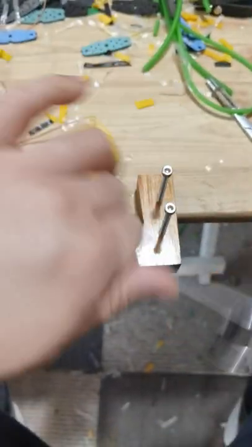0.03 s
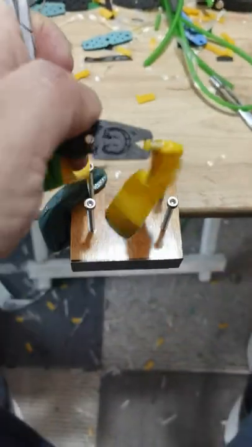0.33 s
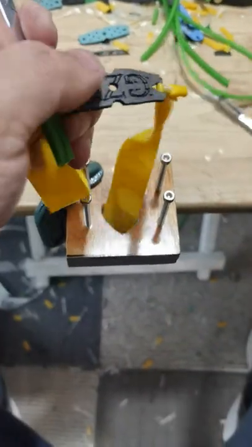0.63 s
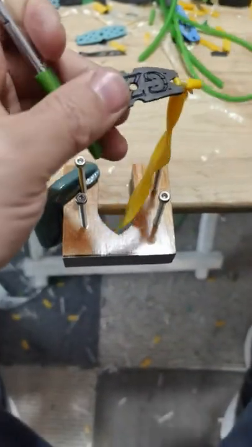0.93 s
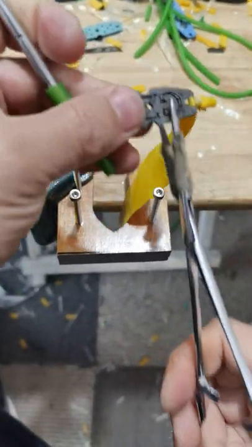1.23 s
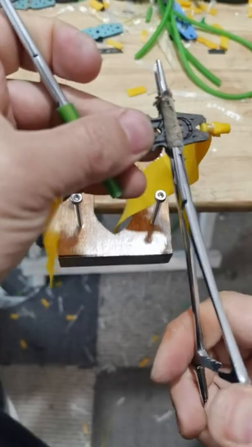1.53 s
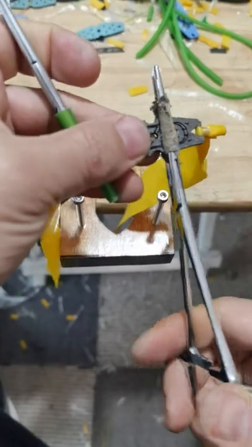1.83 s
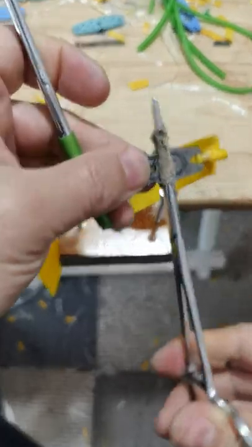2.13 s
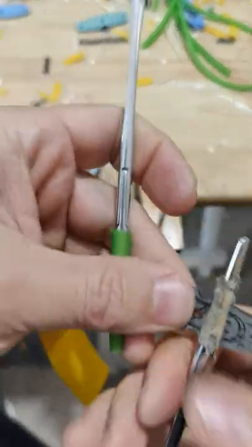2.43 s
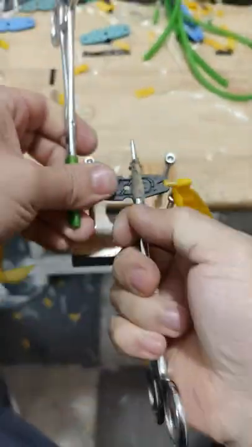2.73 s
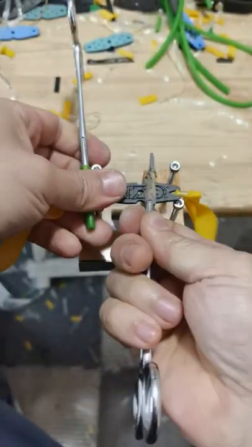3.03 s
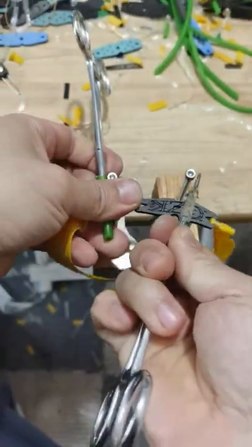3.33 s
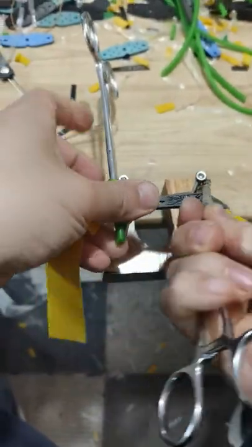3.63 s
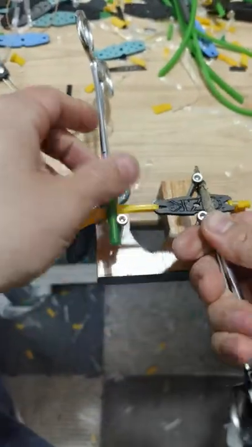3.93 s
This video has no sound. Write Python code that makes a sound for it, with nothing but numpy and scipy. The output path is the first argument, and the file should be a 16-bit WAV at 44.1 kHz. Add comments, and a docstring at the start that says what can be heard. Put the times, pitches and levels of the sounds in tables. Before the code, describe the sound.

After some faint handling and ticking, a steel clamp ratchets shut in a few sharp, close clicks. Then its jaws scrape and tools tick and clack against a wooden jig, over a quiet room's low rumble.

```python
"""At a wooden workbench in a small room, steel forceps are locked onto a small plastic part close by.
Impacts excite the modes of steel and wood: the ratchet snaps over its teeth, the tips tick and ping,
tools clack, and the wooden jig is knocked and nudged. Stick-slip friction makes the jaws scrape and the
part drag. Hands rustle throughout over a low rumble, and the steel reverberates faintly in the room."""
import sys
import numpy as np
from scipy import signal
from scipy.fft import rfft, irfft, next_fast_len
from scipy.io import wavfile

SR = 44100
rng = np.random.default_rng(int(sys.argv[2]) if len(sys.argv) > 2 else 0)


def to_wav(sig):
    """Store sig (one row per channel, or 1-D mono) as 16-bit WAV at the path in sys.argv[1].

    Samples outside -1..1 are clipped; the rate is SR.
    """
    pcm = np.clip(np.atleast_2d(sig), -1, 1) * 32767
    pcm = np.round(pcm).astype(np.int16)
    wavfile.write(sys.argv[1], SR, pcm.T)  # frames by channels


N = 176400

# spectrum of a steel-on-steel crack (frequency [Hz], gain [dB])
STEEL_CRACK_SPECTRUM = [(200, -43), (1500, -9.5), (3500, -22), (5500, -2.5), (8000, 7), (10500, 2),
                        (12200, -28), (16000, -32)]
# resonances of the wood (frequency [Hz], bandwidth [Hz], gain [dB])
WOOD_MODES = [(200.5, 19.3, 3), (405, 97, -1), (539, 87, 0.5), (650, 48, -1), (878, 68, 1),
              (1344, 64, -5.5), (1604, 31, 0.5), (2080, 36, -10.5)]


def amp(db):
    """Decibels to amplitude ratio."""
    return 10 ** (np.asarray(db) / 20)


def unit(x):
    """Normalisation to rms 1."""
    return x / np.sqrt(np.mean(x ** 2) + 1e-20)


def along(points, hz):
    """Interpolation of (frequency [Hz], value) points on a logarithmic axis."""
    freqs, values = np.transpose(points)
    return np.interp(np.log(hz + 1), np.log(freqs + 1), values)


def curve(rows):
    """Linear interpolation of (time [s], value) rows at every sample."""
    return np.interp(np.arange(N) / SR, *np.transpose(rows))


def wobble(rate):
    """Random modulation: straight lines between rate Gaussian knots a second."""
    return np.interp(np.arange(N) * rate / SR, np.arange(N), rng.standard_normal(N))


def pan(db):
    """Interaural level difference: two gains, left over right by db."""
    return amp(np.array([[db], [-db]]) / 2)


def filtered(x, response):
    """Linear filtering: the spectrum of x times a frequency response."""
    n = x.shape[-1]
    padded = next_fast_len(n + SR // 10)
    hz = np.fft.rfftfreq(padded, 1 / SR)
    return irfft(rfft(x, padded) * response(hz), padded)[..., :n]


def shelf(x, hz, low_db, high_db):
    """Shelving filter: separate gains below and above hz."""
    return filtered(x, lambda f: amp(high_db + (low_db - high_db) / (1 + (f / hz) ** 4)))


def colour(points):
    """Spectral envelope through (frequency [Hz], gain [dB]) points."""
    return lambda f: amp(along(points, f))


def body(modes):
    """Modal superposition: the response of second-order resonators of alternating sign."""
    return lambda f: sum((-1) ** k * amp(db) * 1j * f * width / (hz * hz - f * f + 1j * f * width)
                         for k, (hz, width, db) in enumerate(modes))


def noise(response, n):
    """Partly coherent stereo noise of rms 1, nearly mono in the bass."""
    # likeness of left and right (frequency [Hz], correlation [ratio])
    coherence = [(60, 0.73), (180, 0.91), (550, 0.34), (1600, 0), (15000, 0)]

    def mid_side_response(f):
        angle = np.arccos(np.clip(along(coherence, f), -1, 1)) / 2
        return response(f) * np.array([np.cos(angle), np.sin(angle)])

    mid, side = filtered(rng.standard_normal((2, n)), mid_side_response)
    return unit(np.array([mid + side, mid - side]))


def grit(response, n, slips_per_s=1800, spread_db=1, slip_share=0.51):
    """Stick-slip friction: tiny random impulses share the power with a smooth hiss, rms about 1."""
    sizes = amp(spread_db * np.clip(rng.standard_normal(n), -2, 2)) * rng.standard_normal((2, n))
    slipping = rng.random(n) < slips_per_s / SR
    slips = unit(filtered(sizes * slipping, response))
    return np.sqrt(slip_share) * slips + np.sqrt(1 - slip_share) * noise(response, n)


def decay(t, t60, attack=0.0001):
    """Damping: a quick rise, then an exponential fall of 60 dB in t60 seconds; silent before t = 0."""
    t = np.maximum(t, 0)
    return amp(-60 * t / t60) * (1 - np.exp(-t / attack))


def swell(peak_s, db, rise, fall):
    """Exponential growth and decay, 20 dB down one rise before the peak and one fall after it."""
    t = np.arange(N) / SR
    return amp(db - 20 * np.maximum((peak_s - t) / rise, (t - peak_s) / fall))


def add(out, start_s, x):
    """Superposition of x onto out from start_s."""
    i = max(round(start_s * SR), 0)
    out[:, i:i + x.shape[1]] += x[:, :max(N - i, 0)]


def rumble():
    """Ambient noise: the room's low rumble swells when the arms move."""
    # course of the rumble (time [s], relative level [dB])
    levels = [(0, -51), (.3, -54), (.8, -56), (1.5, -63.5), (2, -61), (2.8, -58), (3.3, -57.5), (4, -57)]
    # room noise (frequency [Hz], gain [dB])
    spectrum = [(20, -16), (45, -8.5), (65, 6), (90, -2.5), (130, -4.5), (250, -8), (500, -20.5),
                (1000, -33), (3000, -32.5), (8000, -49)]
    return amp(curve(levels) + 1.5) * noise(colour(spectrum), N)


def rustle():
    """Friction noise: fingers rub on steel and ribbon, a hiss made grainy by amplitude modulation."""
    # course of the rubbing (time [s], relative level [dB])
    levels = [(0, -55.5), (.06, -53), (.12, -60.5), (.19, -58.5), (.3, -58), (.9, -59.5), (1.04, -59),
              (1.28, -64), (1.55, -70.5), (1.79, -70.5), (2.02, -63), (2.3, -58.5), (2.55, -57),
              (2.85, -63.5), (2.99, -61), (3.13, -50), (3.35, -62), (3.6, -56.5), (3.83, -57.5), (4, -77)]
    # hiss of the fingers (frequency [Hz], gain [dB])
    spectrum = [(100, -8.5), (400, -6), (1000, -13.5), (2600, -14), (4000, -17.5), (6000, -7.5), (7200, -9),
                (8500, 1), (10000, -14.5), (11500, -24), (15000, -79)]
    grain_db = 1.5 * wobble(rate=400) + 2.27 * wobble(rate=25.49)
    return amp(curve(levels) + 3 + grain_db) * pan(db=-3.5) * noise(colour(spectrum), N)


def judder():
    """Forced vibration: the jig shudders in its lowest modes as the hand grabs the part."""
    # course of the shudder (time [s], level [dB])
    levels = [(0, -40.5), (.06, -36.5), (.09, -44.5), (.2, -50), (.3, -49), (.45, -80)]
    # low resonances of the jig (frequency [Hz], bandwidth [Hz], gain [dB])
    modes = [(78, 23, -6), (123.5, 17.5, -1.5), (182.4, 28, -9.5)]
    return amp(curve(levels)) * noise(body(modes), N)


def ticks():
    """Impact excitation: the steel tips touch, giving a crack and one short, high ring."""
    # touches (time [s], relative level [dB], left minus right [dB], ring frequency [Hz])
    touches = [(0.0578, -32.5, 0, 8140), (0.078, -38, -5, 8300), (0.24, -31.5, -18.5, 8210),
               (0.5029, -19, 0, 9650), (0.646, -33, 6, 9270), (0.8438, -38.5, -2, 8420),
               (1.439, -43.5, 6, 8530), (2.071, -29, 16, 8800), (2.2448, -36.5, -1, 8400),
               (2.89, -28.5, -6, 8500), (3.1537, -11, 4.5, 8410), (3.233, -34, -7, 7700),
               (3.2423, -13, 3, 8300), (3.2455, -18, 0, 8400), (3.2498, -9.5, 2, 7770),
               (3.254, -14, 14, 8500), (3.2574, -15, 10, 8500), (3.268, -18, 3, 8130),
               (3.442, -22.5, 7, 8700), (3.6162, -13, 10.5, 9010), (3.76, -23, -4, 7540),
               (3.9026, -18, 5.5, 9540)]
    out, t = np.zeros((2, N)), np.arange(SR // 20) / SR
    for start, db, pan_db, hz in touches:
        crack = noise(colour(STEEL_CRACK_SPECTRUM), len(t)) * decay(t, t60=0.011) / 2
        ring = np.sin(2 * np.pi * (hz * t + rng.random((2, 1)))) * decay(t, t60=0.016)
        add(out, start, amp(db) * pan(pan_db) * (crack + amp(-1) * ring))
    return out


def knocks():
    """Damped resonance: a dull blow on wood gives a short crack, a main tone and a noisy ring."""
    # blows (time [s], relative level [dB], attack [s], upper band gain [dB], main tone [Hz])
    blows = [(0.224, -38, 0.0011, -2, 874), (.239, -33.5, 0.0003, 5, 422), (0.465, -40, 0.0015, -0.5, 813),
             (.507, -37, 0.0031, -1.5, 534), (.524, -41.5, 0.0033, -9, 531), (0.58, -55, 0.00068, 0, 663),
             (0.649, -37, 0.0036, -15, 492), (3.236, -32, 0.0063, -3.5, 850)]
    # crack of the contact (frequency [Hz], gain [dB])
    crack_spectrum = [(100, -12), (600, -2), (1550, 4.5), (2300, 0), (3000, -19), (4100, -9.5), (5000, -21),
                      (8500, -2), (12000, -33)]
    # stereo balance of the wood (frequency [Hz], left minus right [dB])
    balance = [(100, 4), (450, 0), (850, 5.5), (1300, 8), (2000, -5), (4000, -11), (9000, 2)]
    out, t = np.zeros((2, N)), np.arange(SR // 2) / SR
    for start, db, attack, upper_db, hz in blows:
        ring = noise(body(WOOD_MODES), len(t)) * decay(t, t60=0.24, attack=attack)
        tone = amp(-3.5) * np.sin(2 * np.pi * hz * t) * decay(t, t60=0.22, attack=attack)
        crack = noise(colour(crack_spectrum), len(t)) * decay(t, t60=0.069, attack=attack)
        add(out, start, amp(db) * (tone + shelf(ring + crack, hz=850, low_db=0, high_db=upper_db)))
    return filtered(out, lambda f: amp(np.outer([1, -1], along(balance, f)) / 2))


def pings(waver_rad=0.23):
    """Free vibration: steel that no finger damps rings on faintly, its phase a little unsteady."""
    # thin rings (time [s], frequency [Hz], level [dB], t60 [s], left minus right [dB])
    rings = [(.24, 8090, -33, 0.049, -11), (.502, 10030, -35, 0.04, -13), (.503, 7480, -39, 0.078, -12),
             (1.4397, 5830, -52, 0.043, 4), (2.303, 5790, -57.5, 0.26, -18), (2.306, 7779, -55, 0.45, -19),
             (2.89, 2515, -54.5, 0.35, -2), (2.912, 2690, -55, .22, -11), (3.243, 6080, -28, 0.1, -4),
             (3.25, 7720, -32, 0.099, -1), (3.917, 5580, -37, .25, -8), (3.917, 6500, -31.5, 0.088, -11)]
    out, t = np.zeros((2, N)), np.arange(SR // 3) / SR
    for start, hz, db, t60, pan_db in rings:
        phase = 2 * np.pi * (hz * t + rng.random((2, 1))) + waver_rad * wobble(rate=486)[:len(t)]
        add(out, start, amp(db) * pan(pan_db) * np.sin(phase) * decay(t, t60))
    return out


def drags():
    """Stick-slip excitation: the dragged part drives the wood's resonances under a light rasp."""
    # strokes (peak time [s], level [dB], rise [s], fall [s], rasp gain [dB])
    strokes = [(.515, -44, 0.077, 0.12, -7), (.65, -48, 0.079, 0.04, -4), (3.248, -31.5, 0.057, 0.092, -10)]
    # rasp of the part on wood (frequency [Hz], gain [dB])
    rasp_spectrum = [(300, 9), (1600, -4), (2500, -2.5), (4200, -2.5), (4900, -34)]
    out = np.zeros((2, N))
    for peak_s, db, rise, fall, rasp_db in strokes:
        wood = grit(body(WOOD_MODES), N)
        rasp = amp(rasp_db) * grit(colour(rasp_spectrum), N)
        out += swell(peak_s, db, rise, fall) * (wood + rasp)
    return out


def scrapes():
    """Sliding friction: serrated jaws and fingers slip over the part in gritty swells."""
    # slides (peak time [s], level [dB], rise [s], fall [s], low band gain [dB], left minus right [dB])
    slides = [(.588, -47.5, .012, 0.014, 8, -5), (2.561, -45.5, 0.21, 0.3, -1.5, -8.5),
              (3.128, -22, 0.011, 0.0098, -34, -3.5), (3.253, -18, 0.024, 0.032, -4, -1.5),
              (3.546, -40.5, 0.044, 0.051, -5, -2), (3.637, -39, 0.043, 0.021, -14, -3)]
    # scrape of the jaws (frequency [Hz], gain [dB])
    spectrum = [(300, -13), (1500, -14.5), (3000, -8.5), (4200, -10), (6000, -3.5), (8200, 2.5),
                (10000, -6), (12000, -27.5), (13500, -29), (16000, -33)]
    out = np.zeros((2, N))
    for peak_s, db, rise, fall, low_db, pan_db in slides:
        friction = shelf(grit(colour(spectrum), N), hz=3700, low_db=low_db, high_db=0)
        out += pan(pan_db) * friction * swell(peak_s, db, rise, fall)
    return out


def clacks(scatter_db=5.5):
    """Modal excitation: loose tools clack and rattle, each contact favouring different resonances."""
    # contacts (time [s], relative level [dB], left minus right [dB], t60 [s], treble gain [dB])
    contacts = [(.835, -49.5, -1, 0.22, -17), (2.888, -45.5, -2, 0.26, 0), (3.3435, -33, 1.5, 0.29, -6.5),
                (3.441, -35, -0.5, 0.31, -10), (3.802, -51.5, -4, 0.63, 0), (3.873, -44, -3.5, 0.23, 8.5),
                (3.915, -37, -2.5, 0.74, 6)]
    # rattle of the tools (frequency [Hz], gain [dB])
    rattle_spectrum = [(100, -13), (400, -6), (700, -5), (1600, -2), (2500, -4), (4000, -0.5), (6000, 3),
                       (9500, 0), (11500, -30), (15000, -57)]
    # resonances of the tools (frequency [Hz], bandwidth [Hz], mean gain [dB])
    tool_modes = [(1362, 11, 4.5), (1657, 80, 1), (2233, 250, -6.5), (2790, 94, -4), (3244, 63, 3),
                  (5600, 210, -1.5), (5980, 300, -2.5), (8600, 62, 6.5)]
    out, t = np.zeros((2, N)), np.arange(SR // 2) / SR
    for start, db, pan_db, t60, treble_db in contacts:
        modes = [(hz, width, gain + scatter_db * rng.standard_normal()) for hz, width, gain in tool_modes]
        rattle = grit(colour(rattle_spectrum), len(t))
        ring = noise(body(modes), len(t))
        clack = shelf(rattle + ring, hz=3670, low_db=0, high_db=treble_db)
        envelope = decay(t, t60, attack=0.0027) + 0.56 * decay(t, t60=0.04, attack=0.001)
        add(out, start, amp(db) * pan(pan_db) * clack * envelope)
    return out


def steel_ring(t, modes):
    """Impulse response of the forceps: one damped sinusoid for each mode."""
    return sum(amp(db) * pan(pan_db) * decay(t, t60) * np.sin(2 * np.pi * hz * t)
               for hz, db, t60, pan_db in modes)


def ratchet(split_hz=7050, low_cut_hz=1770, right_lag_s=0.000022):
    """Impact and rebound: each tooth snaps home and strikes again within 1 ms, ringing the steel."""
    # teeth (time [s], relative level [dB], left minus right [dB], high mode tuning [ratio],
    # rebound delay [ms], rebound amplitude [ratio], low mode gain [dB], low mode tuning [ratio])
    teeth = [(1.9753, -9.5, 5, 1.01, 0.98, 0.47, -4, 0.88), (1.9875, -11, -7, 1.02, 0.76, 0.4, -1, 0.96),
             (2.0043, 2.5, -3, 0.99, 0.69, 0.23, -1.5, 0.98),
             (2.0372, -2, -5.5, .99, 0.636, 0.18, -0.5, 1.072),
             (2.0859, -19.5, 3, 0.915, 0.433, 0.37, 7, 1.194)]
    # hand-damped forceps (base frequency [Hz], gain [dB], t60 [s], left minus right [dB])
    steel_modes = [(1730, -29.5, 0.012, -1), (2484, -17, 0.009, -10), (3960, -18, 0.0097, -3),
                   (4870, -17, 0.0084, -11.5), (6570, -16, 0.0056, -16), (7170, -15.5, 0.0099, -13.5),
                   (8030, -16, 0.014, -11), (8830, -7, 0.013, 2), (9180, -8.5, 0.0098, 14),
                   (10060, -16.5, 0.0063, 8), (11300, -12, 0.0088, 3.5), (12500, -21, 0.0048, -3),
                   (13600, -27, 0.0063, 3), (14800, -32, 0.0064, 0)]
    out, t = np.zeros((2, N)), np.arange(SR // 20) / SR
    arrival = t - np.array([[0], [right_lag_s]])
    for start, db, pan_db, high_tuning, rebound_ms, rebound_gain, low_db, low_tuning in teeth:
        # the modes below split_hz shift with the grip
        modes = [(hz * (low_tuning if hz < split_hz else high_tuning), gain, t60, side)
                 for hz, gain, t60, side in steel_modes]
        crack = amp(-12.5) * noise(colour(STEEL_CRACK_SPECTRUM), len(t)) * decay(t, t60=0.007)
        rebound = rebound_gain * steel_ring(arrival - rebound_ms / 1000, modes)
        snap = steel_ring(arrival, modes) + rebound + crack
        snap = shelf(snap, hz=11900, low_db=0, high_db=0.28 * db)  # harder snaps are brighter
        add(out, start, amp(db) * pan(pan_db) * shelf(snap, split_hz, low_db, high_db=0))
    return signal.sosfilt(signal.butter(4, low_cut_hz, 'high', fs=SR, output='sos'), out)


def bumps():
    """Soft impacts excite low frequencies: pushes set the jig and bench booming briefly."""
    # pushes (time [s], level [dB], frequency [Hz], attack [s], t60 [s])
    pushes = [(2.851, -43.5, 197, 0.0059, 0.47), (3.05, -44.5, 178, 0.011, 0.16),
              (3.152, -47, 188.6, 0.0047, 1), (3.345, -38, 200.5, 0.0043, 0.32),
              (3.509, -38, 220, 0.002, 0.063), (3.616, -36, 182.5, 0.002, 0.17),
              (3.838, -38, 181, 0.0039, 0.16), (3.854, -37.5, 178, 0.0032, 0.11)]
    # dull thud (frequency [Hz], gain [dB])
    thud_spectrum = [(40, -39), (120, 1), (220, 1), (450, -5.5), (700, -17.5), (1500, -23), (4000, -56)]
    out, t = np.zeros((2, N)), np.arange(SR // 2) / SR
    for start, db, hz, attack, t60 in pushes:
        boom = np.sin(2 * np.pi * hz * t) + amp(-3.5) * noise(colour(thud_spectrum), len(t))
        add(out, start, amp(db) * boom * decay(t, t60, attack))
    return out


def groan():
    """Friction-driven resonance: the jig groans softly as the part is pressed and rubbed into it."""
    # course of the groan (time [s], level [dB])
    levels = [(3.0, -77), (3.2, -61), (3.55, -55.5), (3.64, -51), (3.78, -51.5), (3.85, -49), (3.95, -60)]
    # resonances of the rubbed jig (frequency [Hz], bandwidth [Hz], gain [dB])
    modes = [(188, 34, 1), (273, 32.6, -1.5), (396, 110, -8), (505, 63, -8)]
    return amp(curve(levels)) * noise(body(modes), N)


def room(x):
    """Diffuse reverberation: convolution with decaying noise, different at each side."""
    # reverberation time (frequency [Hz], t60 [s])
    decay_times = [(200, 0.7), (2000, 0.96), (8000, 0.39), (14000, 0.2)]
    # colour of the reverberation (frequency [Hz], gain [dB])
    spectrum = [(200, 14), (2500, -9), (5000, -4.5), (7300, -3.5), (8700, 0), (10000, -1.5), (14000, -5)]
    hz, t, bands = signal.stft(rng.standard_normal((2, SR // 2)), SR, nperseg=256)
    envelopes = decay(t, along(decay_times, hz)[:, None], attack=0.006)
    _, tail = signal.istft(bands * envelopes, SR, nperseg=256)
    tail /= np.linalg.norm(tail[0])
    return signal.fftconvolve(filtered(x, colour(spectrum)), tail, axes=1)[:, :N]


def scene():
    """Superposition of the direct sounds, the forceps' reverberation and the background."""
    lock, tips, jaws = ratchet(), ticks() + pings(), scrapes()
    reverberation = room(amp(-17) * (lock + jaws) + amp(-15.5) * tips)
    bench = knocks() + drags() + clacks() + bumps() + judder() + groan()
    return lock + tips + jaws + reverberation + bench + rustle() + rumble()


def record(dry, cutoff_hz=16400):
    """Band limiting: a steep low-pass removes the highest treble."""
    return filtered(dry, lambda hz: 1 / (1 + (hz / cutoff_hz) ** 80))


dry = scene()
out = record(dry)
to_wav(out)
```